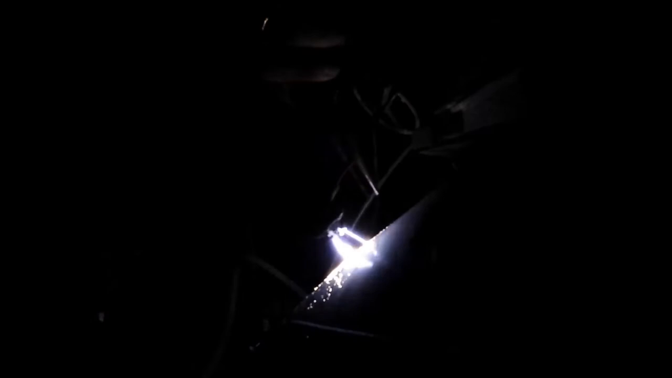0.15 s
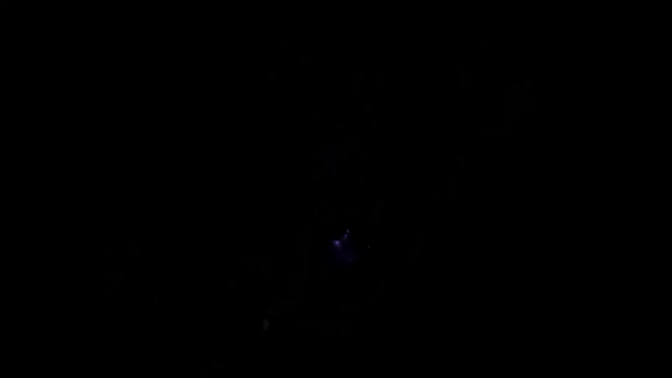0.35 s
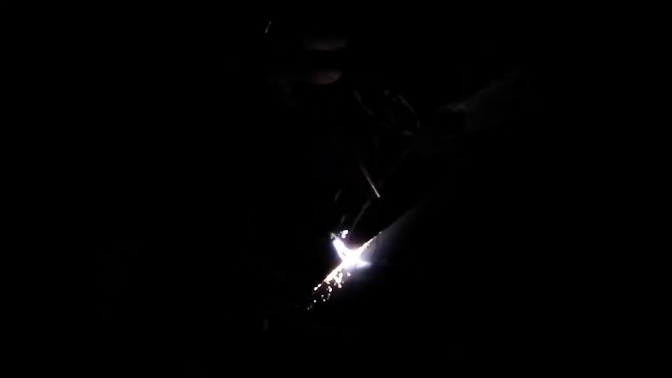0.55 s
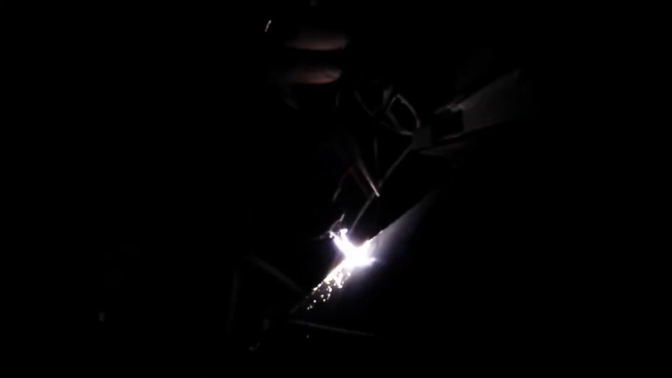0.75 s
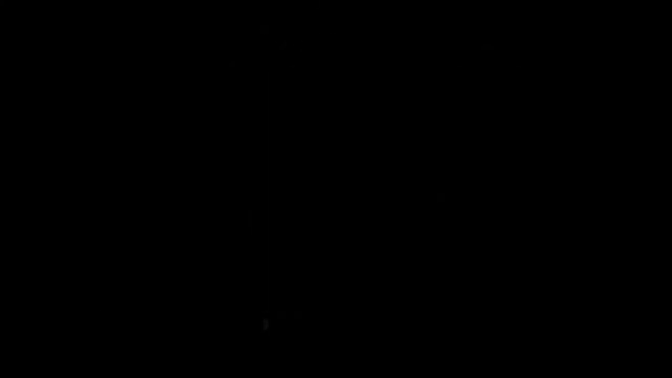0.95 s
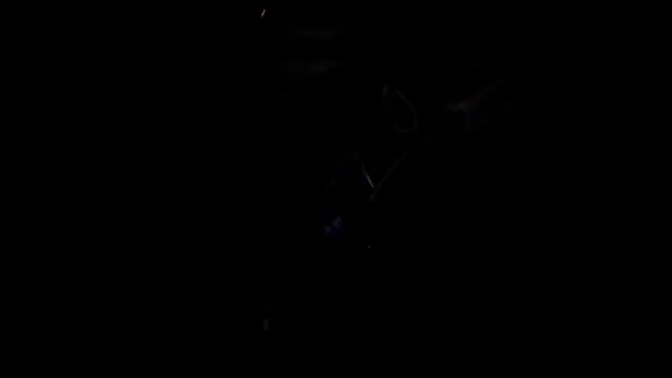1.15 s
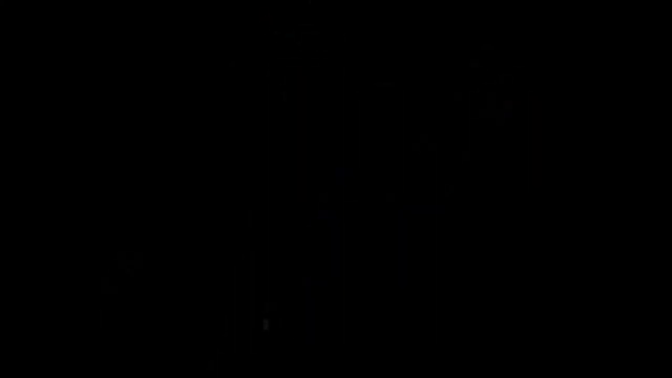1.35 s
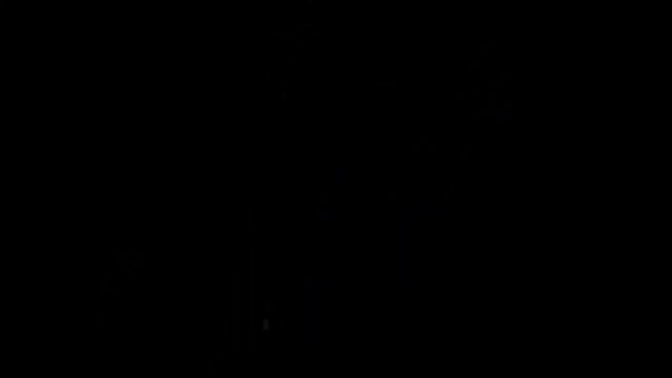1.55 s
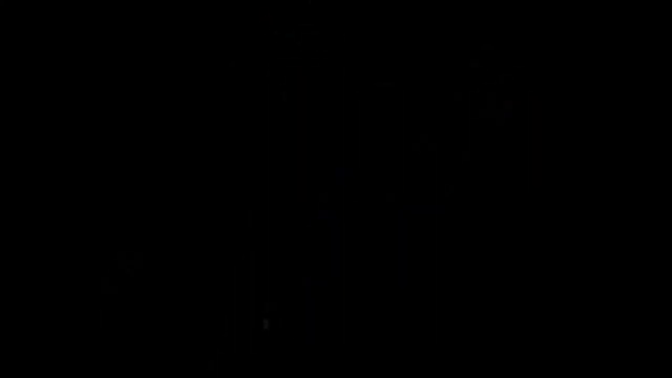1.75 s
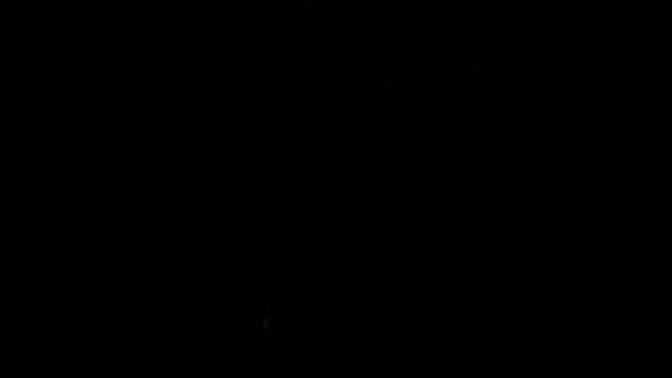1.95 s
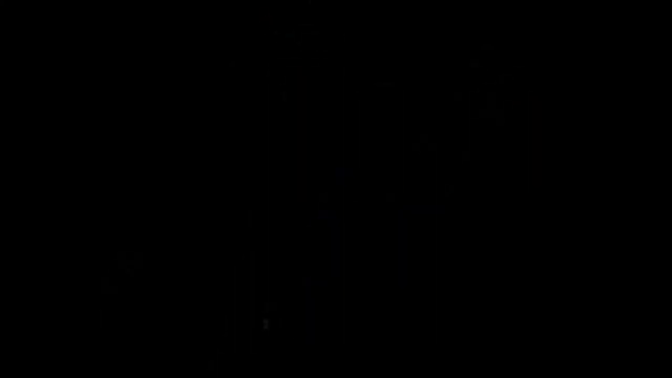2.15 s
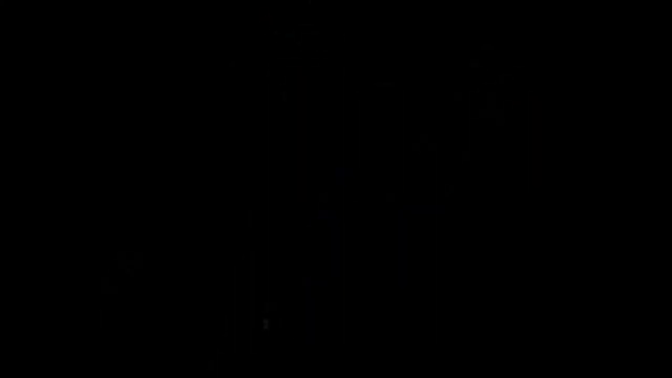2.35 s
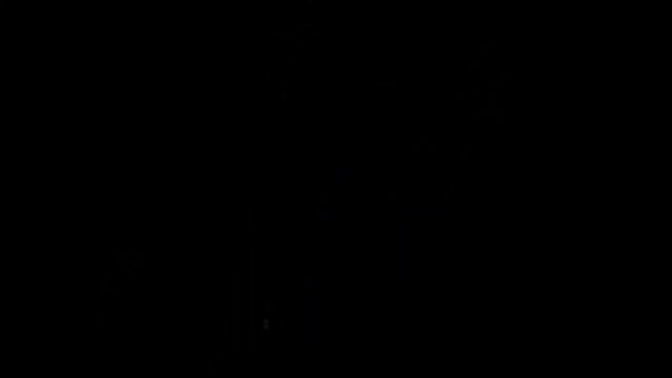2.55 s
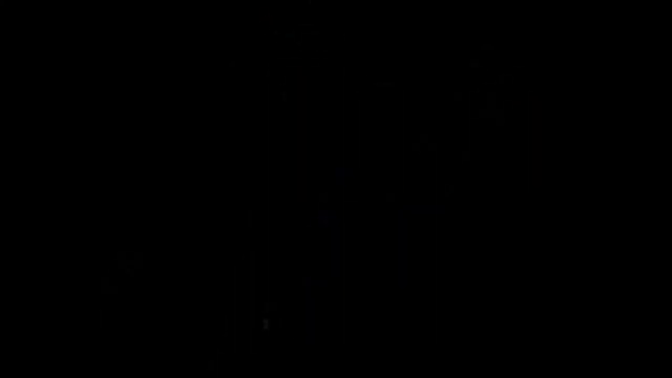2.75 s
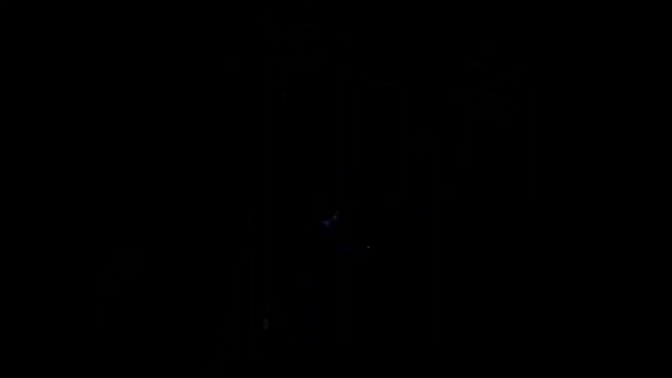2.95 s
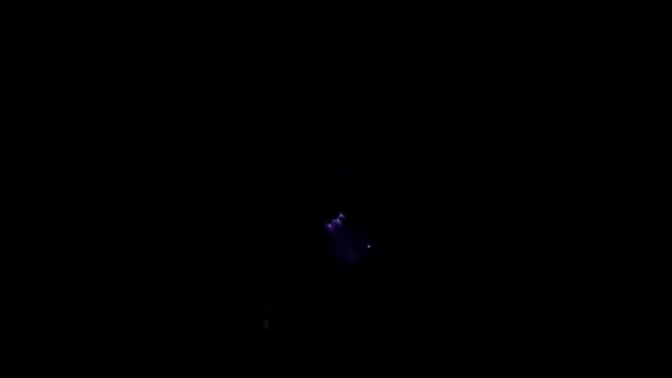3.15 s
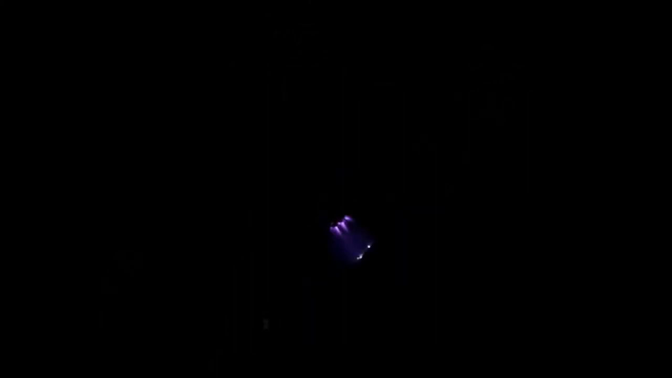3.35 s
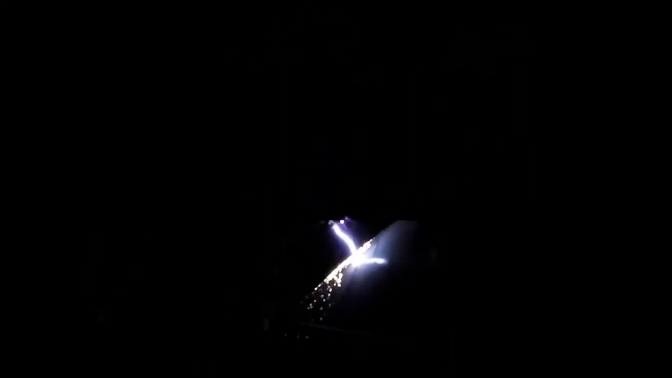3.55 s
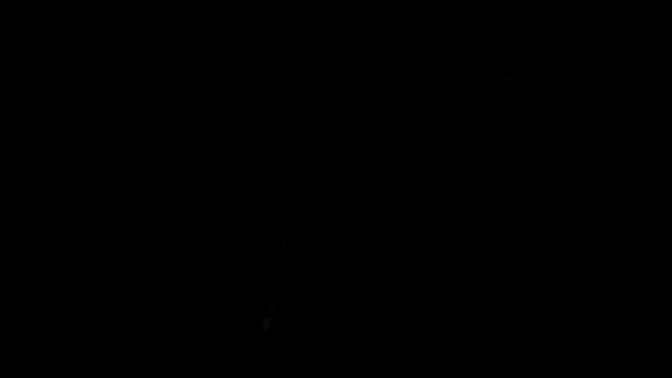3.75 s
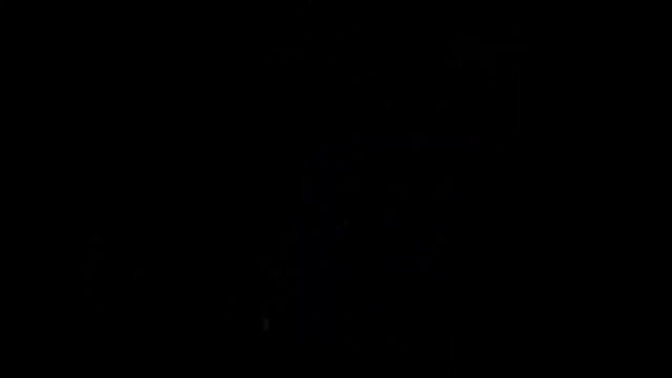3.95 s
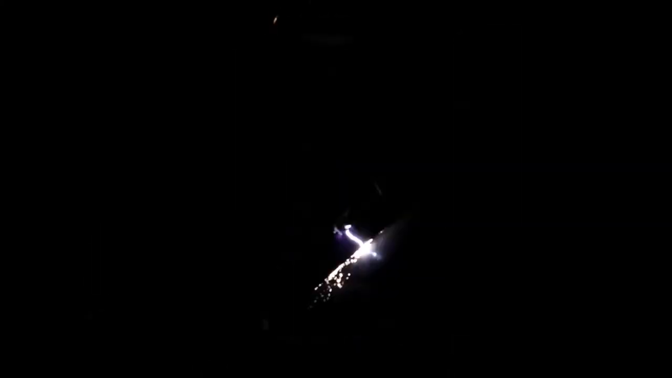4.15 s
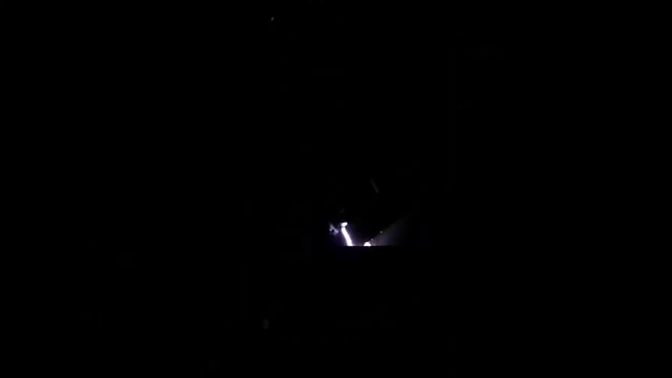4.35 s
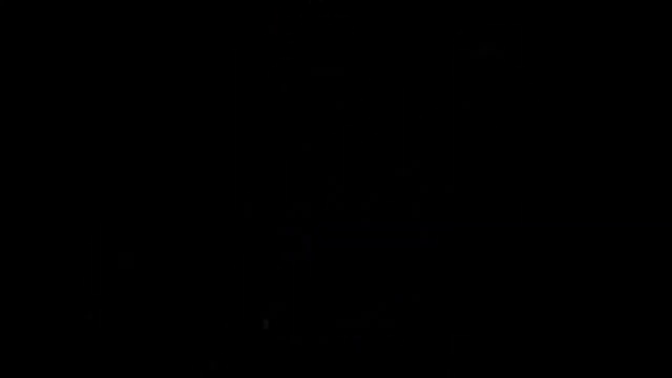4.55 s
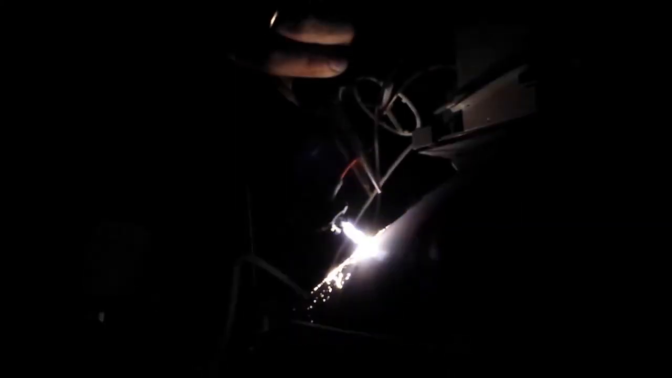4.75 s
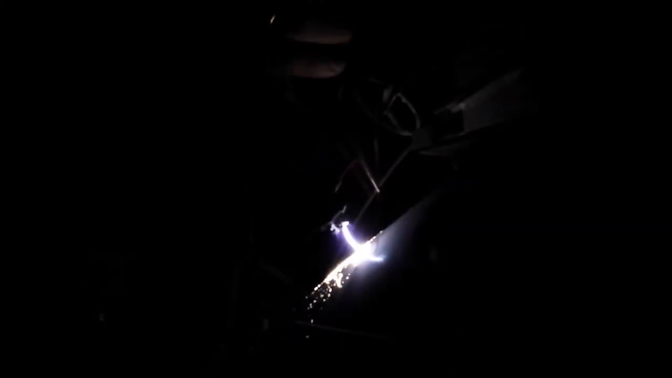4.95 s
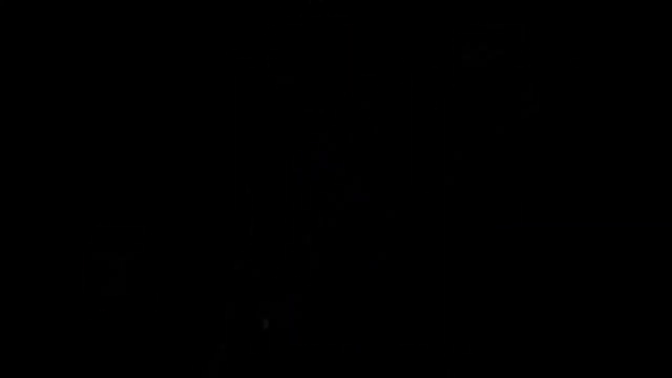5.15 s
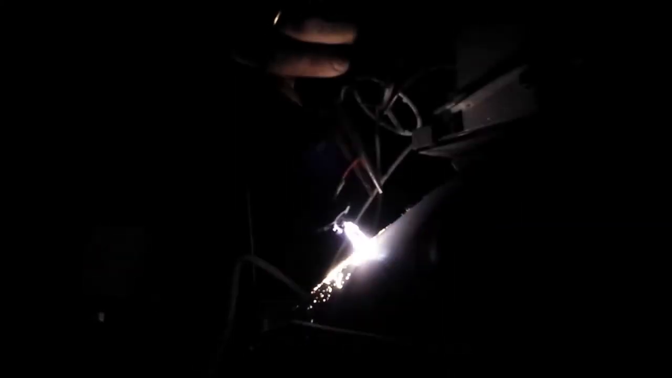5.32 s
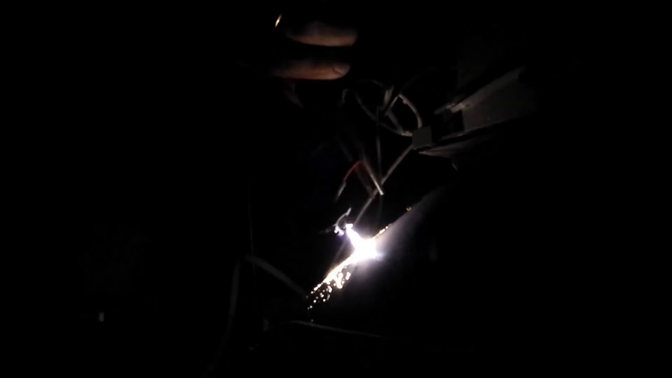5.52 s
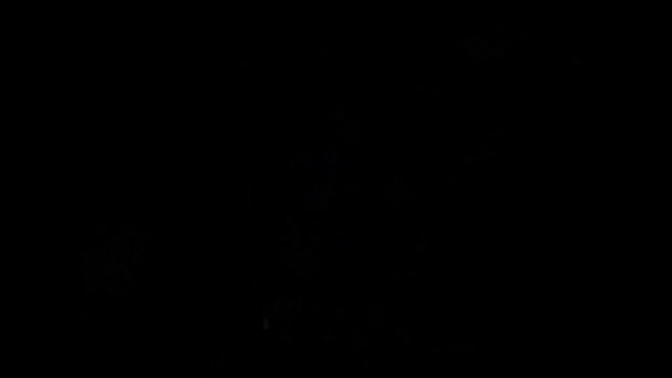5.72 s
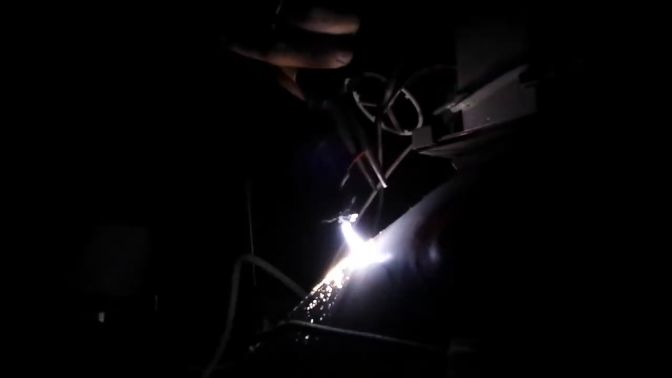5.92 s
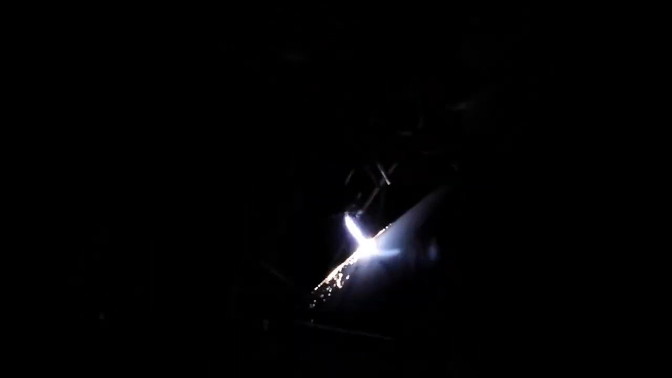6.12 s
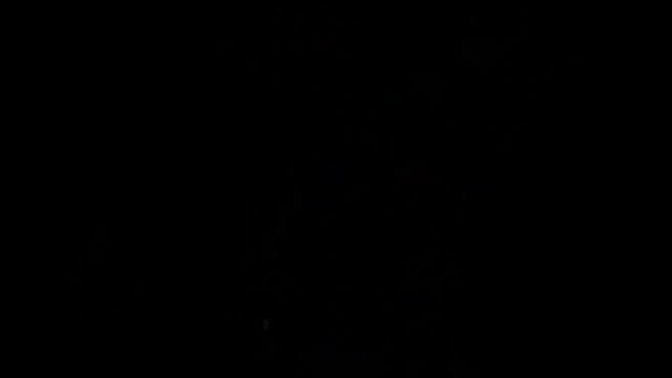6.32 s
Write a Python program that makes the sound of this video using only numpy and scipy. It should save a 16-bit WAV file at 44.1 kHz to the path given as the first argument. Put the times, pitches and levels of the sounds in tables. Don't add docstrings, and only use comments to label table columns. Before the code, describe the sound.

The sound opens on the fading bright ring of an earlier discharge, over faint transformer hum, low rumble and a thin hiss. At 0.1 s fizz shoots up and loud sparks snap across the gap, with runs to 0.35 s, from 0.58 to 0.85 s and from 1.05 to 1.2 s. Each run is a ragged, buzzing rattle of about a hundred cracks a second, so close that the stereo microphone clips and thumps. The short room tail dies into quiet hum until 2.7 s, when tiny lone ticks quickly multiply into a soft sizzling corona, steady around 3 s and swelling towards 3.4 s. At 3.45 s it breaks into violent sparks; further runs hit at about 4.1, 4.7, 5.3 and 5.85 s, many with a second volley close behind. The last crackles stop near 6.2 s, leaving a brief fizzing ring.

```python
import sys
import numpy as np
from scipy import signal
from scipy.fft import rfft, irfft, next_fast_len
from scipy.io import wavfile
from scipy.ndimage import uniform_filter1d, map_coordinates

SR = 44100
rng = np.random.default_rng(int(sys.argv[2]) if len(sys.argv) > 2 else 0)


def rack_gain(trim_db):
    fader = np.asarray(trim_db, float)
    return 10 ** (fader / 20)


def inscribe(sig):
    pcm = np.round(np.clip(np.atleast_2d(sig).T, -1, 1) * 32767)
    wavfile.write(sys.argv[1], SR, pcm.astype(np.int16))


N = 285768


def unit(x):
    return x / np.sqrt(np.mean(x ** 2) + 1e-20)


def along(points, hz):
    f, value = np.transpose(points)
    return np.interp(np.log(hz + 1), np.log(f + 1), value)


def wobble(rate):
    knots = rng.standard_normal(int(N * rate / SR) + 4)
    return map_coordinates(knots, [np.arange(N) * rate / SR])


def filtered(x, response):
    m = next_fast_len(N + 8192)
    return irfft(rfft(x, m) * response(np.fft.rfftfreq(m, 1 / SR)), m)[..., :N]


def coloured(x, spectrum):
    gain = rack_gain(along(spectrum, np.fft.rfftfreq(4096, 1 / SR)))
    cepstrum = irfft(np.log(gain + 1e-4))
    cepstrum[1:2048] *= 2
    cepstrum[2049:] = 0
    ring = irfft(np.exp(rfft(cepstrum)))
    return signal.fftconvolve(x, ring / np.linalg.norm(ring))[:N]


def leftover():
    level_db, t60_s = -29.5, 0.56
    tail = np.array([coloured(port, FIZZ) for port in rng.standard_normal((2, N))])
    return rack_gain(level_db - 60 * np.arange(N) / SR / t60_s) * tail


# pitch in Hz, level in dB rms.
HUM_LINES = [(99, -72), (161.5, -65), (201, -81), (243.5, -62), (324, -71), (489.9, -64), (686, -73),
             (832, -83)]


def hum():
    t = np.arange(N) / SR
    total = np.zeros(N)
    for hz, db in HUM_LINES:
        unsteady = rack_gain(1.5 * wobble(5)) * np.exp(.9j * wobble(6))
        total += np.sqrt(2) * rack_gain(db) * np.imag(unsteady * np.exp(2j * np.pi * hz * t))
    return total


# frequency in Hz, density in dB per Hz.
RUMBLE = [(20, -30), (33, 6), (55, -6), (90, -6), (125, -17), (200, -2.5), (400, -9.5), (800, -12),
          (1600, -18.5), (2600, -44)]
# frequency in Hz, left-right likeness from -1 to 1.
ALIKENESS = [(60, 0.39), (240, 0.81), (950, 0.17), (3770, -0.22), (15000, -0.27)]


def floor():
    def colour_and_turn(hz):
        turn = np.arccos(np.clip(along(ALIKENESS, hz), -1, 1)) / 2
        return rack_gain(along(RUMBLE, hz)) * [np.cos(turn), np.sin(turn)]

    mid, side = filtered(rng.standard_normal((2, N)), colour_and_turn)
    return rack_gain(-56.5 + wobble(3.34)) * unit(np.array([mid + side, mid - side]))


def ports(x, balance):
    return filtered(x, lambda hz: rack_gain(along(balance, hz) * [[.5], [-.5]]))


# frequency in Hz, density in dB per Hz.
LEAK_COLOUR = [(1060, -43), (1800, -13.5), (2710, -8.5), (2960, -2.5), (3560, -5), (3830, -3), (4040, 0),
               (5410, -1), (6070, 1), (7580, -2), (8810, -6.5), (12900, -13.5), (14300, -16), (15000, -18)]
# frequency in Hz, left minus right in dB.
LEAK_PORTS = [(60, -2), (240, 9.5), (950, 6), (3770, -9.5), (15000, 29)]


def leak():
    hiss = np.array([coloured(port, LEAK_COLOUR) for port in rng.standard_normal((2, N))])
    return rack_gain(-48 + 1.66 * wobble(4.33)) * ports(hiss, LEAK_PORTS)


# corona start in seconds, first breakdown in seconds, corona reached in dB, extra strength in
BURSTS = [
    (.078, 0.103, -10, 0.46),
    (0.554, 0.579, -15.5, 1.3),
    (1.037, 1.055, -18, 1.8),
    (3.437, 3.449, -17, 0.97),
    (4.006, 4.081, -13, 2.2),
    (4.639, 4.686, -9.5, 1.5),
    (5.276, 5.304, -11.5, 1.14),
    (5.834, 5.853, -15.5, 1.58),
]
# first spark in seconds, last spark in seconds, sparks a second, typical jolt in full scales,
# corona in dB.
RUNS = [(.106, 0.145, 140, 0.69, -13), (0.208, 0.337, 98.3, 0.71, -10.5), (0.576, 0.626, 142, 0.92, -6),
        (.667, 0.854, 113.5, 0.68, -13), (1.054, 1.095, 130, 0.673, -16.5), (1.177, 1.216, 63, .28, -9),
        (3.453, 3.579, 89, 0.92, -10), (3.673, 3.689, 129, .2, -7), (4.079, 4.208, 124, 0.73, -12),
        (4.274, 4.396, 83, 0.57, -8), (4.683, 4.859, 115, 1.06, -12), (4.903, 4.988, 120, 0.61, -27),
        (5.001, 5.03, 41.2, 0.47, -7.5), (5.309, 5.411, 119.4, 0.86, -12.5), (5.465, 5.651, 139, .85, -20),
        (5.856, 6.096, 130.3, 1.04, -9.5), (6.179, 6.223, 53.7, 0.42, -8)]
# time in seconds, corona level in dB.
BUILD = [
    (2.69, -64),
    (2.76, -35),
    (2.824, -25),
    (3.074, -24),
    (3.294, -16.5),
    (3.444, -15.5),
    (3.456, -12),
]


def drive():
    lead_db, lead_bend = 22, 2.74
    regrow_db_per_s, quench_db_per_s, linger_s = 157, 402, 0.012
    t = np.arange(N) / SR
    s, db = np.transpose(BUILD)
    gain = rack_gain(np.interp(t, s, db)) * (t >= s[0]) * (t < s[-1])
    for onset, breakdown, reached_db, _ in BURSTS:
        left = np.clip((breakdown - t) / (breakdown - onset), 0, 1)
        climb = rack_gain(reached_db - lead_db * left ** lead_bend)
        gain = np.maximum(gain, climb * (t >= onset) * (t < breakdown + .002))
    for first, last, _, _, corona_db in RUNS:
        breakdown = max(row[1] for row in BURSTS if row[0] < first)
        regrow_db = regrow_db_per_s * np.maximum(first - t, 0)
        quench_db = quench_db_per_s * np.maximum(t - last - linger_s, 0)
        gain = np.maximum(gain, rack_gain(corona_db - regrow_db - quench_db) * (t >= breakdown))
    return gain


# frequency in Hz, density in dB per Hz.
FIZZ = [(250, -33), (400, -29), (1000, -18), (1900, -16.5), (2300, -11), (2800, -9), (3600, -7.5),
        (4500, -7.5), (5150, 0.5), (6000, -6), (6900, -2.5), (8600, -4.5), (10500, -11), (15500, -16.5)]
# time in seconds, peak in dB.
TICKS = [
    (2.6967, -30),
    (2.7177, -36),
    (2.725, -24),
    (2.75, -18),
    (2.7544, -33),
    (2.7574, -32),
    (2.7654, -28),
    (2.7703, -26),
    (2.7802, -13),
]


def corona(rate, spread_db):
    fires = rng.random(N) < rate / SR * rack_gain(3 * wobble(60))
    streamers = unit(fires * rack_gain(spread_db * rng.standard_normal(N)))
    train = drive() * streamers
    for s, db in TICKS:
        train[round(s * SR)] += rack_gain(db + 13.5)
    return coloured(train, FIZZ)


CHANCE = rng.random((len(RUNS), 48, 5))


def strikes():
    gap_scatter = .8
    scatter_db, biggest = 7.5, 2.9
    parting = 1.2
    rows = []
    for (first, last, rate, jolt, _), chance in zip(RUNS, CHANCE):
        k = np.arange(len(chance))
        s = first + (k + gap_scatter * (chance[:, 0] - .5) * (k > 0)) / rate
        keep = s < last + .5 / rate
        normal = np.sqrt(-2 * np.log(chance[:, 1:3])) * np.cos(2 * np.pi * chance[:, 3:])
        sizes = np.minimum(jolt * rack_gain(scatter_db * normal), biggest)
        sizes[keep.sum() - 1] = parting * jolt
        rows.append(np.c_[np.minimum(s, last), sizes][keep])
    return np.concatenate(rows)


# frequency in Hz, density in dB per Hz.
CRACK = [(240, -62), (400, -8), (1590, -4.5), (2470, -3.5), (3460, -3), (3740, -1), (5740, 2.5),
         (8410, -0.5), (15500, -6.5)]


def sparks(level_db):
    s, left, right = np.transpose(strikes())
    train = np.zeros(N)
    train[np.round(s * SR).astype(int)] = np.hypot(left, right)
    for _, breakdown, _, strength in BURSTS:
        train[round(breakdown * SR)] += strength
    t = np.arange(400) / SR
    fading = signal.fftconvolve(train, rack_gain(-60 * t / 0.0021))[:N]
    return rack_gain(level_db) * coloured(fading * rng.standard_normal(N), CRACK)


LEAN = np.array([.06, -.06])


def jolts(settle, rise, dither, reach):
    def decay(u):
        return (1 - u / settle) * np.exp(-u / settle)

    rows = strikes()
    s, sizes = rows[:, 0], rows[:, 1:]
    chance, steps = rng.standard_normal(sizes.shape), np.zeros(sizes.shape)
    for k in range(len(s)):
        rest = decay(s[k] - s[:k]) @ steps[:k]
        thrown = rest - np.sign(rest + LEAN + dither * chance[k]) * sizes[k]
        steps[k] = np.clip(thrown, -reach, reach) - rest
    train = np.zeros((2, N))
    train[:, np.round(s * SR).astype(int)] = steps.T
    u = np.arange(SR // 3) / SR
    recovery = decay(u) * (1 - np.exp(-u / rise))
    return signal.fftconvolve(train, recovery[None], axes=1)[:, :N]


def flicker(depth, hold):
    rows = strikes()
    train = np.zeros(N)
    train[np.round(rows[:, 0] * SR).astype(int)] = np.clip(rows[:, 1:].sum(axis=1), 0, 1)
    busy = np.clip(signal.fftconvolve(train, np.hanning(round(hold * SR)))[:N], 0, 1)
    return depth * busy * np.tanh(1.47 * np.array([wobble(430), wobble(430)]))


# frequency in Hz, time to fall 60 dB in seconds.
ROOM = [(500, 0.34), (3000, 0.49), (8000, 0.48), (15000, 0.32)]


def room(x, wet_db, echo):
    near = np.zeros((2, SR // 20))
    near[[0, 1], [0, 5]] = 1
    for port in near:
        port[rng.integers(8, 500, size=9)] = echo * rng.standard_normal(9)
    near /= np.linalg.norm(near, axis=1)[:, None]
    starts = sorted(round(onset * SR) for onset, *_ in BURSTS + BUILD[:1]) + [N]
    length = SR * 5 // 8
    heard = np.zeros((2, N + SR))
    for a, b in zip(starts, starts[1:]):
        hz, t, z = signal.stft(rng.standard_normal((2, length)), SR, nperseg=256)
        dying = z * rack_gain(-60 * t / along(ROOM, hz)[:, None])
        tail = signal.istft(dying, SR, nperseg=256)[1][:, :length]
        tail[:, :200] = 0
        answer = rack_gain(wet_db) * tail / np.linalg.norm(tail[0])
        answer[:, :SR // 20] += near
        part = signal.fftconvolve(x[None, a:b], answer, axes=1)
        heard[:, a:a + part.shape[1]] += part
    return heard[:, :N]


def notched(x, notches):
    def response(hz):
        dips = [1 - np.clip(depth, 0, 1) * np.exp(-((hz - c) / w) ** 2) for c, w, depth in notches]
        return np.prod(dips, axis=0)

    return filtered(x, response)


def writhing(x, patchy_db):
    dull_hz, dull_db = 10100, 4
    swell_start, swell_end = BUILD[0][0], BUILD[-1][0]
    hz, t, z = signal.stft(x, SR, nperseg=512)
    field = uniform_filter1d(rng.standard_normal(z.shape), size=3, axis=1)
    field = uniform_filter1d(field, size=16, axis=2)
    young = np.clip((swell_end - t) / (swell_end - swell_start), 0, 1) * (t > swell_start)
    loss_db = dull_db * np.clip(hz[:, None] / dull_hz - .8, 0, 1) * (1 + young) * (young > 0)
    return signal.istft(z * rack_gain(patchy_db * unit(field) - loss_db), SR, nperseg=512)[1][:, :N]


# frequency in Hz, share of small time-and-pitch cells that drop out.
STARVED = [(1900, 0), (2500, .04), (4500, .05), (6000, .012), (8500, .02), (10000, .12), (15500, .14)]


def starved(x):
    dip_hz, jump_hz, hold_s = 3500, 380, .06
    still_hz = 3120
    width_hz, depth = 125, .97
    cell_hz, cell_s = 200, .05
    hz, t, z = signal.stft(x, SR, nperseg=1024)
    paths = rng.standard_normal(int(t[-1] / hold_s) + 1)[(t / hold_s).astype(int)]
    swelling = (t > BUILD[0][0]) & (t < BUILD[-1][0])
    centre = np.where(swelling, still_hz, dip_hz + jump_hz * paths)
    dip = 1 - depth * np.exp(-((hz[:, None] - centre) / width_hz) ** 4)
    band, frame = (hz / cell_hz).astype(int), t / cell_s
    cells = rng.random((band[-1] + 1, int(frame[-1]) + 2))
    shift = rng.random(band[-1] + 1)
    chance = cells[band[:, None], (frame + shift[band][:, None]).astype(int)]
    dropped = chance < along(STARVED, hz)[:, None]
    thinned = signal.istft(z * dip * (1 - depth * dropped), SR, nperseg=1024)[1][:, :N]
    return np.clip(thinned, -1, 1)


# frequency in Hz, left minus right in dB.
FIZZ_PORTS = [(60, -8), (110, 4), (200, 5), (380, -1), (700, 1), (1290, -6), (2380, 0.5), (4400, -6),
              (8120, 3), (15000, 18.5)]
# frequency in Hz, left minus right in dB.
CRACK_PORTS = [(60, -3.5), (240, -2), (950, 1), (3770, -3), (15000, 3.5)]
# centre in Hz, width in Hz, depth from 0 to 1.
FIZZ_NOTCHES = [(7620, 330, .9), (11300, 200, .6), (12400, 250, .7), (14300, 350, .8)]
# centre in Hz, width in Hz, depth from 0 to 1.
IDLE_NOTCHES = [(5350, 150, .95), (6050, 130, .93), (11700, 200, .6), (14050, 250, .8)]


def scene():
    fizz = room(rack_gain(-2.5) * corona(rate=3000, spread_db=4.5), wet_db=-1, echo=1.0)
    fizz = notched(ports(fizz, FIZZ_PORTS), FIZZ_NOTCHES)
    cracks = ports(room(sparks(level_db=8.5), wet_db=-5.0, echo=0.78), CRACK_PORTS)
    arc = writhing(fizz + cracks + leftover(), patchy_db=1.9)
    return arc + notched(leak(), IDLE_NOTCHES) + hum() + floor()


def band_limit(x):
    return signal.sosfilt(signal.butter(12, 15660, fs=SR, output="sos"), x)


def record(dry):
    driven = dry + 1.185 * jolts(settle=.022, rise=0.00049, dither=.05, reach=1.25)
    driven = driven + flicker(depth=.27, hold=.016)
    railed = np.clip(driven, -.97, .97)
    return band_limit(starved(railed))


dry = scene()
out = record(dry)
inscribe(out)
```